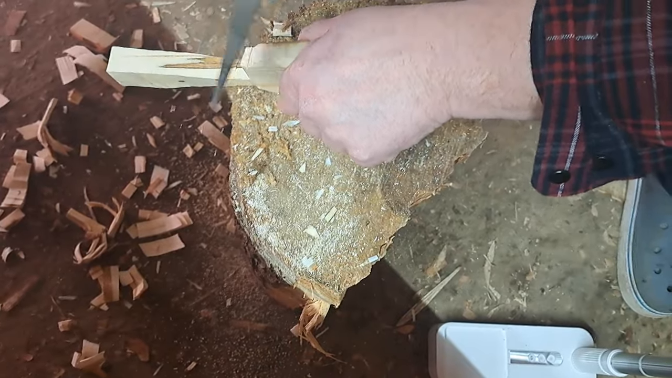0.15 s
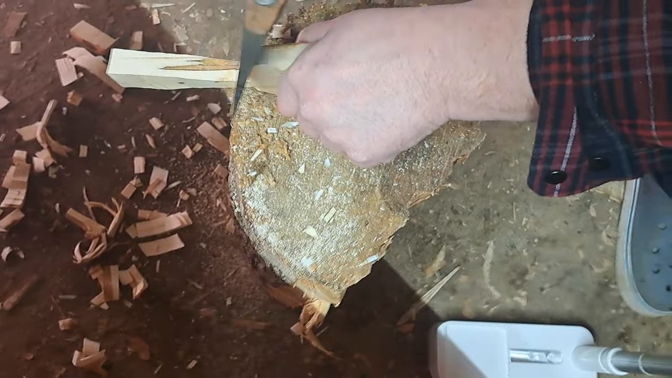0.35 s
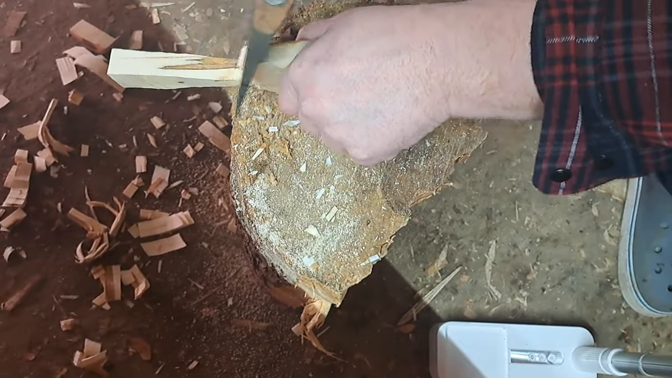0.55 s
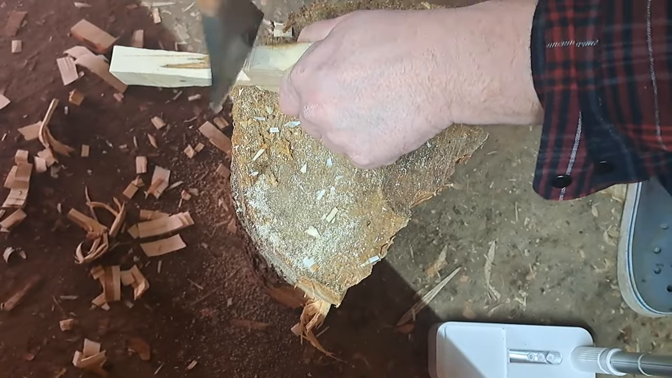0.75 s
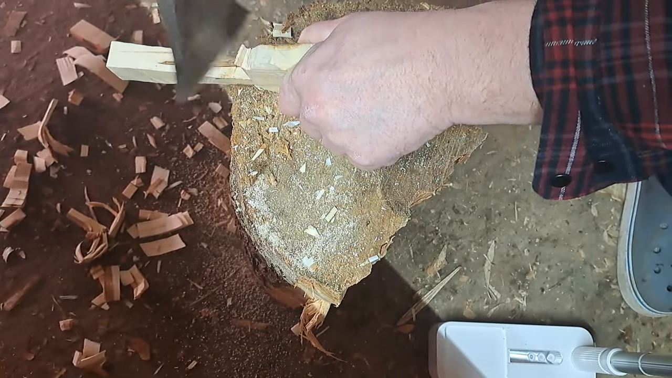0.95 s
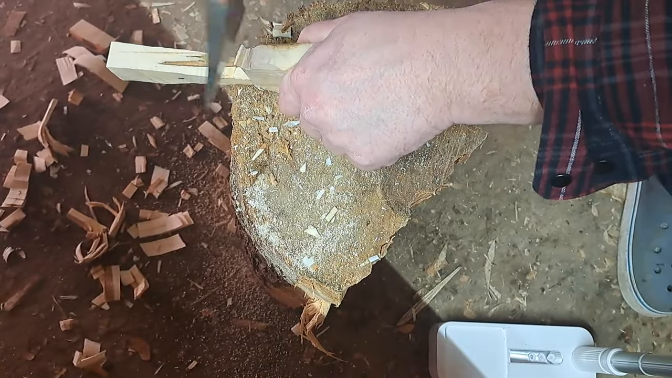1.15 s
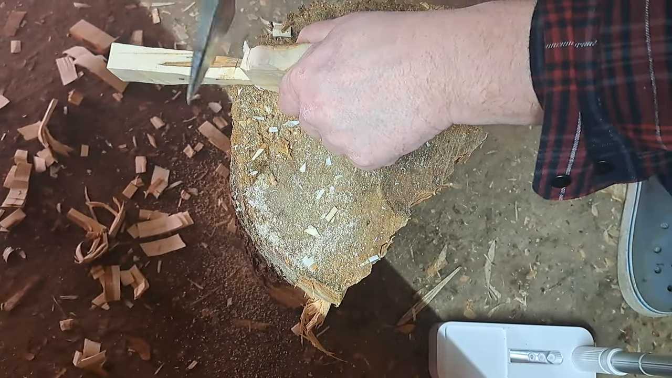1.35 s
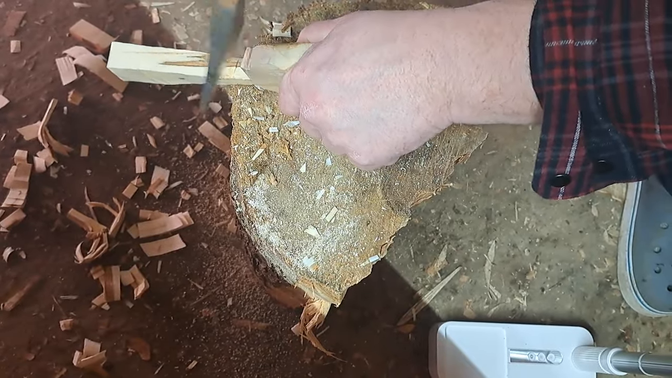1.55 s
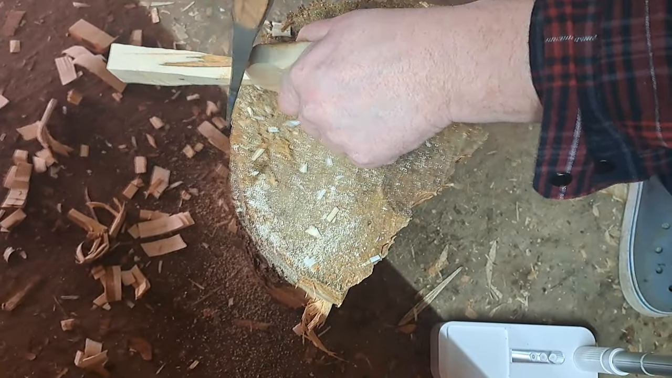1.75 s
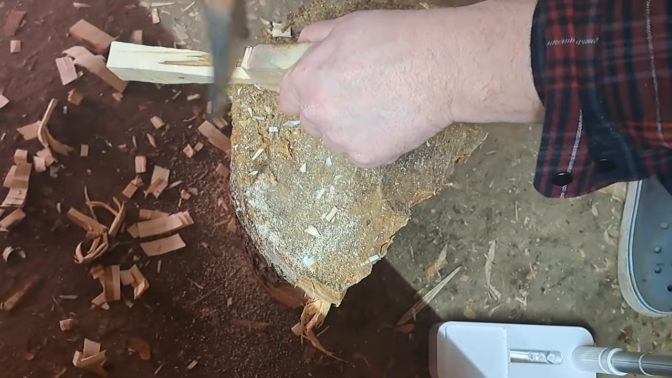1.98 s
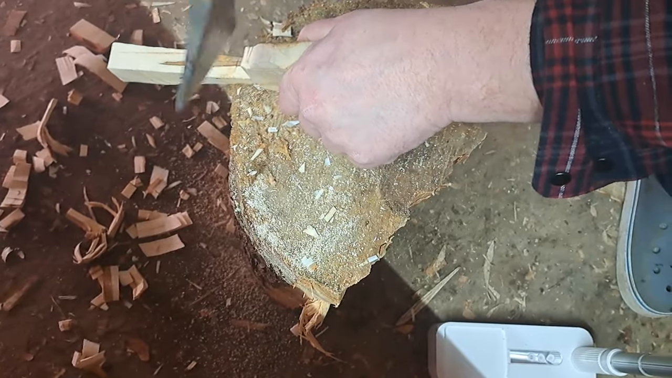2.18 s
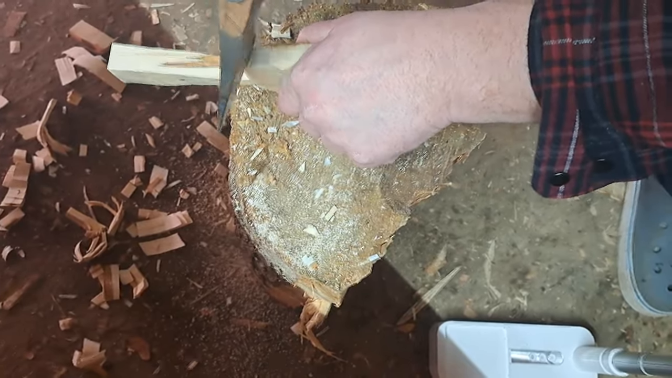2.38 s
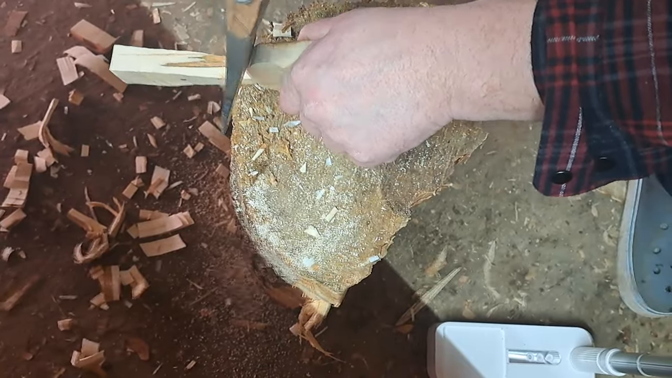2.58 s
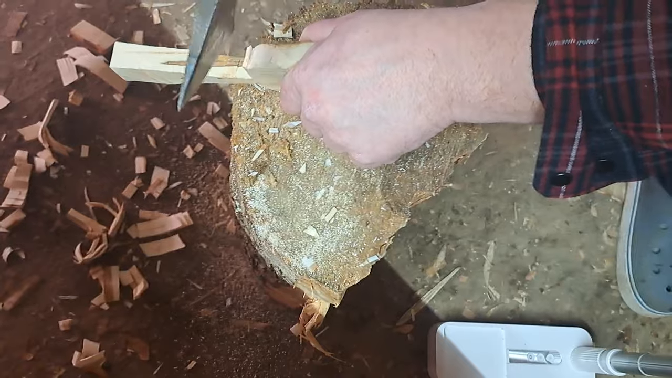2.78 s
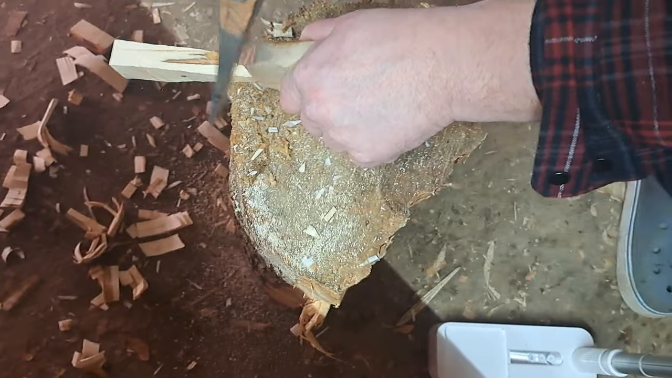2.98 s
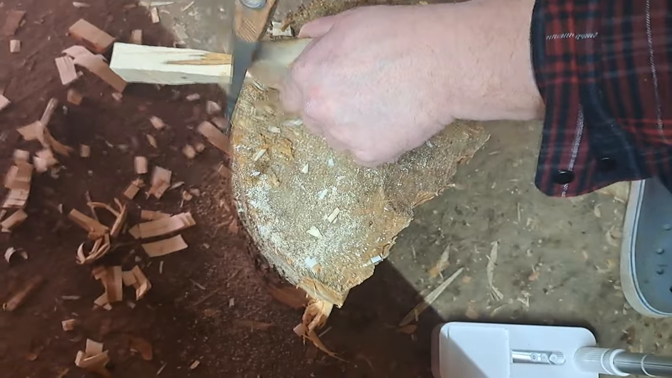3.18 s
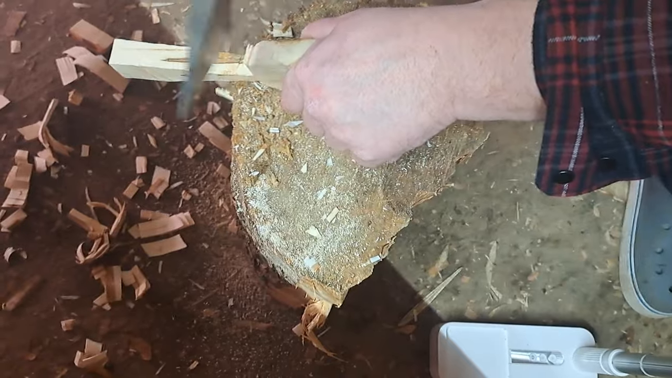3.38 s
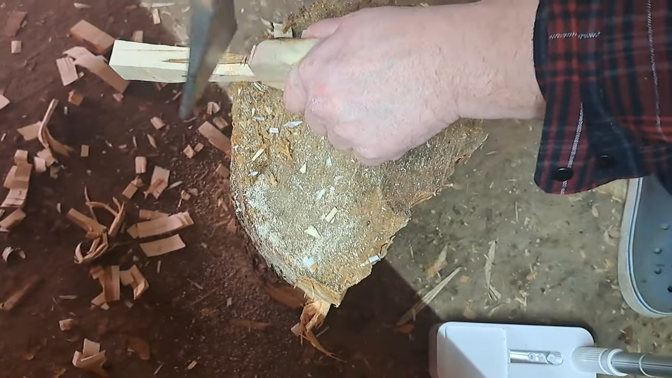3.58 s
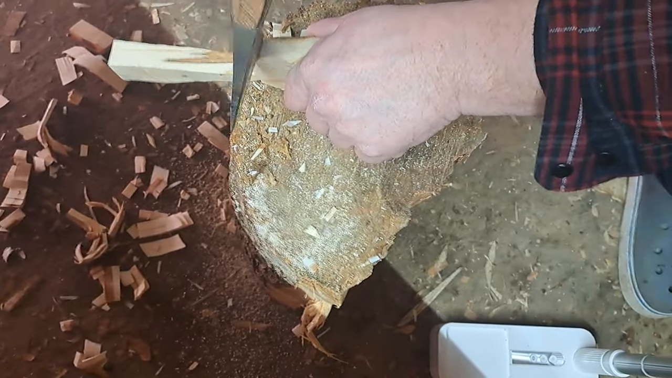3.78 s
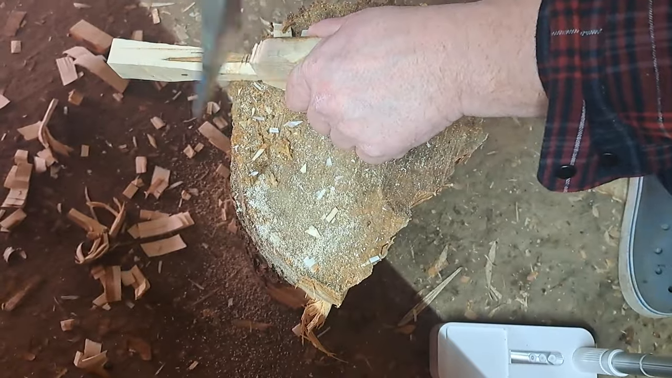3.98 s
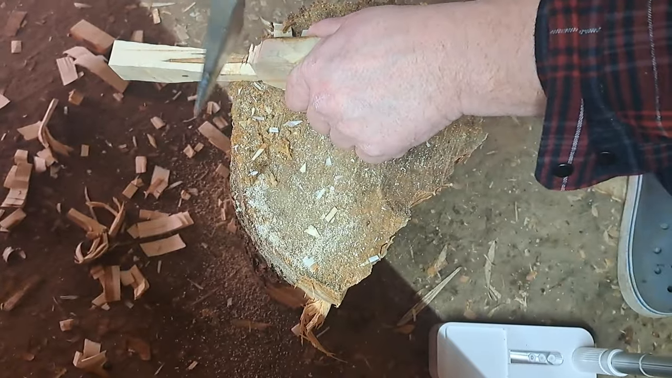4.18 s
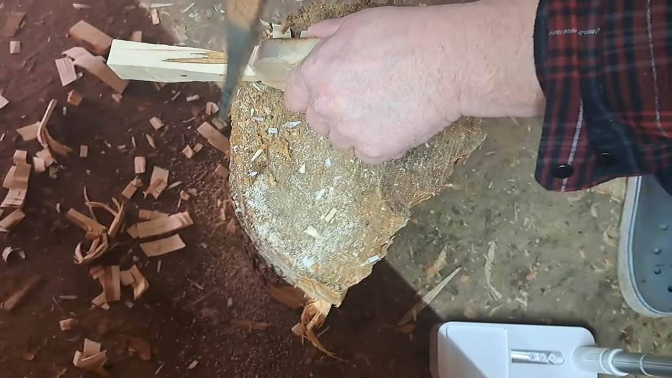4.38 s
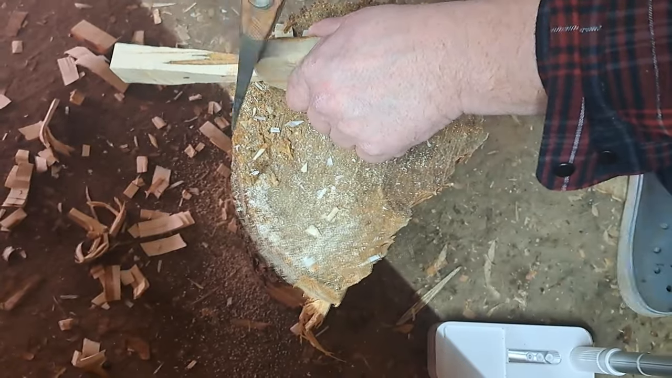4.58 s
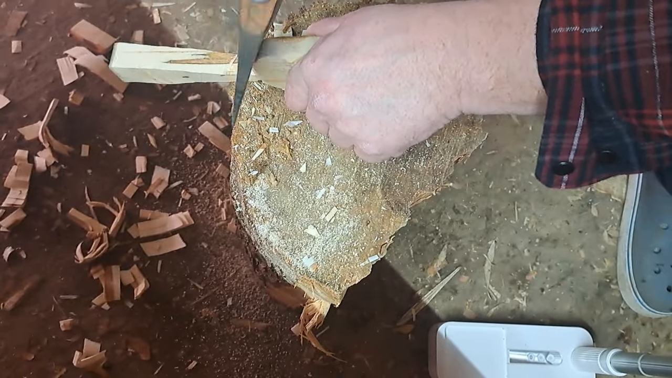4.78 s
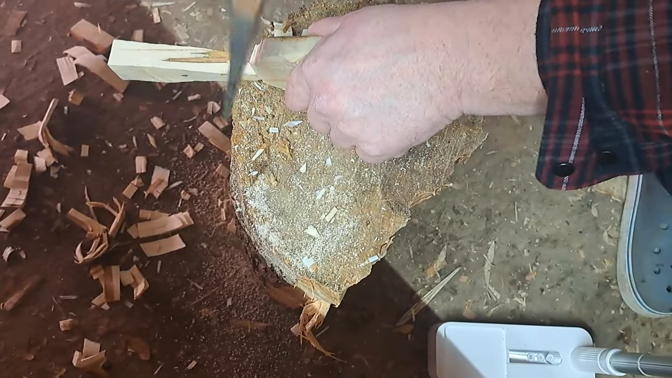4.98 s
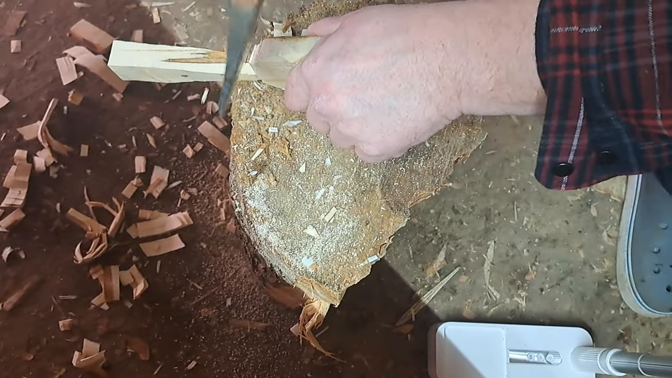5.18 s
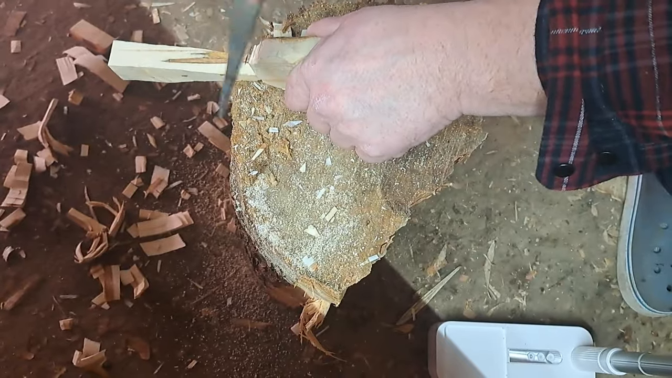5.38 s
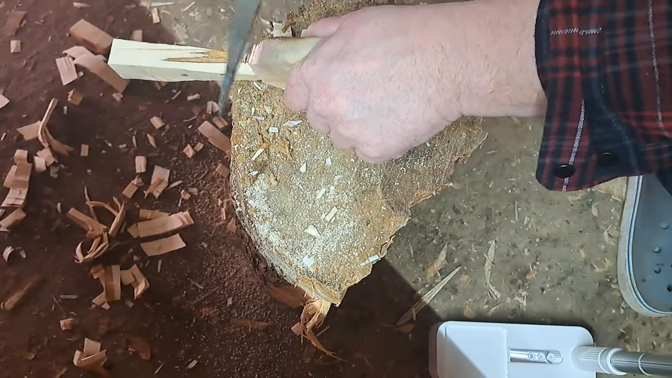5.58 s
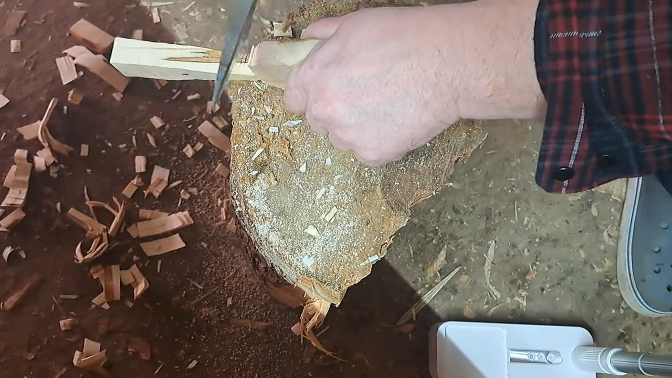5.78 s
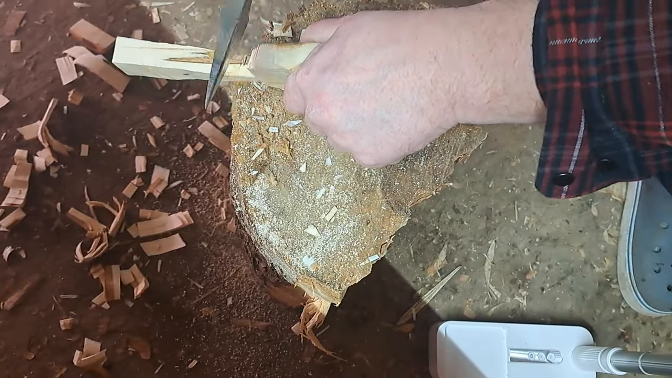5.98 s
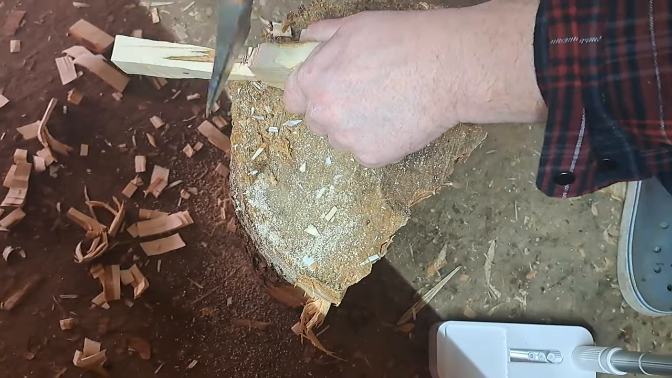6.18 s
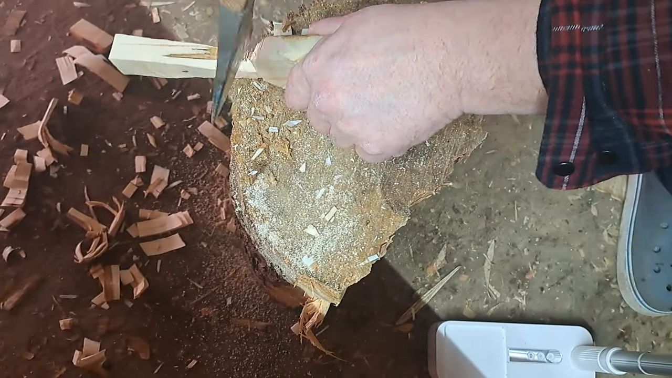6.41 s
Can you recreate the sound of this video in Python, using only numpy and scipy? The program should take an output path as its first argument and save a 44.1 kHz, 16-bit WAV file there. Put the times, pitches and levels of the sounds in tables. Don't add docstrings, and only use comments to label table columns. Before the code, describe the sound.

Close-up wood carving in a quiet workshop: sharp fibrous snaps of an axe edge, each backed by a short low thump of block and floor. Three strong chops, a gap with cloth rustle and faint chip ticks, a restart growing to full force, then lighter chops at about five a second, ending in small double-contact taps. The nearby microphone rattles dryly on its stand after the heavier blows; the room dies away quickly.

```python
import sys
import numpy as np
from scipy import signal
from scipy.fft import rfft, irfft
from scipy.io import wavfile

SR = 44100
rng = np.random.default_rng(int(sys.argv[2]) if len(sys.argv) > 2 else 0)


def elevation(decibels):
    levels = np.asarray(decibels, float)
    return 10 ** (levels / 20)


def unload_audio(sound):
    columns = np.transpose(np.atleast_2d(sound))
    steps = np.round(np.clip(columns, -1, 1) * 32767)
    wavfile.write(sys.argv[1], SR, steps.astype(np.int16))


N = 284443

# (time [s], strength [dB], knock of a flat hit [dB], treble of splintering [dB])
CRACK_EVENTS = [(0.0155, -24.5, 10.5, -14), (0.3026, -24.5, 14.5, -1), (0.5862, -28, 4.5, -12.5),
                (1.4541, -37.5, 2, -4), (1.6275, -51.5, 0.5, -11), (1.7625, -33.5, -0.5, -8.5),
                (2.0453, -25.5, 1.5, -6.5), (2.3293, -21.5, -1, -12), (2.615, -21.5, 0.5, -10.5),
                (2.9045, -25.5, 11.5, 5.5), (3.197, -26.5, 11, -0.5), (3.4708, -28.5, 5, -7),
                (3.4812, -43.5, 2, 14), (3.664, -57, 6.5, 1.5), (3.7973, -37.5, 6, -8.5),
                (4.0729, -36.5, 8, -1.5), (4.3343, -33.5, 8, -8), (4.581, -41.5, 7.5, 1),
                (4.8208, -34, 1.5, -8), (5.0478, -31, 5.5, -10.5), (5.2562, -34.5, 11.5, -12.5),
                (5.4625, -30.5, 5.5, -14), (5.672, -33, 8.5, -15.5), (5.6818, -41, -3, -9),
                (5.882, -60, 15.5, 12), (5.9075, -48, 6.5, 8.5), (6.104, -44.5, 3.5, 5.5),
                (6.127, -56, 7, 15), (6.3223, -44, 4, -10), (6.3441, -55, 15.5, 15)]


def at_hz(points, hz, order=1):
    table = np.array(points)
    return np.interp(np.log(hz), np.log(table[:, 0]), table[:, order])


def clicks(times, gains):
    out = np.full(N, 1e-18)
    places = np.clip((np.asarray(times) * SR).astype(int), 0, N - 1)
    np.add.at(out, places, gains)
    return out


def ring(x, hz, t60):
    r = elevation(-60 / (t60 * SR))
    w = 2 * np.pi * hz / SR
    return signal.lfilter([0, np.sin(w)], [1, -2 * r * np.cos(w), r * r], x)


def fade(x, t60):
    return signal.lfilter([1], [1, -elevation(-60 / (t60 * SR))], x)


def band(x, low, high):
    sos = signal.butter(2, [low, min(high, .45 * SR)], "band", fs=SR, output="sos")
    return signal.sosfilt(sos, x)


def half_octaves(low, count):
    return [low * 2 ** (k / 2 + np.array([0, .25, .5])) for k in range(count)]


def spectrum_hz():
    return np.maximum(np.fft.rfftfreq(N + 1, 1 / SR), 1)


def sides(x, balance):
    half = at_hz(balance, spectrum_hz()) / 2
    return irfft(rfft(x, N + 1) * elevation(np.array([half, -half])), N + 1)[:, :N]


def bursts(s, family_db, edges_hz, t60, click, spread_db):
    grains = rng.standard_normal(N) * elevation(spread_db * np.minimum(rng.exponential(1, N), 4))
    grains = grains / grains.std()
    out = np.zeros(N)
    for k, (level_db, low, high) in enumerate(zip(family_db, edges_hz, edges_hz[1:])):
        struck = clicks(s, elevation(level_db))
        dulled_click = click * elevation(-3 * k)
        pulse = dulled_click * struck + fade(struck, t60) * grains
        density = np.sqrt(SR / 2 / (high - low))
        out += (-1) ** k * density * band(pulse, low, high)
    return out


def air():
    # (frequency [Hz], density [dB per Hz])
    spectrum = [(15, -51), (25, -1.5), (92, 7), (313, -3.5), (358, -16.5), (410, -7.5), (600, -24.5),
                (1120, -14), (1360, -47.5), (2210, -17.5), (3510, -55), (4020, -29), (9080, -44.5),
                (12600, -19), (16500, -46.5)]
    # (frequency [Hz], likeness [-1 to 1])
    likeness = [(60, 0.92), (240, 0.2), (950, 0.61), (3770, -0.19), (15000, -0.19)]
    # (frequency [Hz], difference [dB])
    balance = [(60, -14.5), (180, -1.5), (550, 17), (1650, -16.5), (4970, -27.5), (15000, 13.5)]
    level_db = -64
    mid, side = rng.standard_normal((2, N + 1))
    hz = spectrum_hz()
    alike = np.clip(at_hz(likeness, hz), 0, 1)
    pair = np.sqrt(1 + alike) * rfft(mid) + np.sqrt(1 - alike) * rfft(side) * [[1], [-1]]
    shaped = irfft(pair * elevation(at_hz(spectrum, hz)) / np.sqrt(1 + alike), N + 1)[:, :N]
    return elevation(level_db) * sides(shaped / shaped.mean(axis=0).std(), balance)


def movement():
    # (time [s], sleeve rustle [dB], floor sway [dB])
    course = [(0.0, -68.5, -38.5), (0.5, -76, -57.5), (0.74, -60.5, -80), (0.92, -76, -75),
              (1.15, -69.5, -91), (1.4, -72, -64), (1.62, -63.5, -47), (2.0, -58.5, -45), (2.46, -61, -66),
              (3.1, -59, -48.5), (4.1, -65, -51.5), (4.47, -75, -50.5), (4.9, -63.5, -37),
              (5.8, -106.5, -49.5), (6.23, -65, -41.5), (6.45, -63, -37)]
    recoil_db, recoil_rise_s, recoil_t60_s = -20.5, 0.036, 0.33
    s, rustle_db, sway_db = np.transpose(course)
    t = np.arange(N) / SR
    left, right, deep = rng.standard_normal((3, N))
    cloth = np.array([left, right])
    rustle = band(cloth, 770, 3800) + 0.5 * band(cloth, 2100, 2400) + 0.17 * band(cloth, 3700, 4760)
    sway = band(band(deep, 35, 47), 35, 47)
    struck, strength_db = np.transpose(CRACK_EVENTS)[:2]
    slow = np.exp(-1 / (recoil_rise_s * SR))
    shake = fade(clicks(struck, elevation(strength_db + recoil_db)), recoil_t60_s)
    recoil = signal.lfilter([1 - slow], [1, -slow], shake)
    sleeve = (elevation(np.interp(t, s, rustle_db)) + recoil) * rustle / rustle.std()
    return sleeve + elevation(np.interp(t, s, sway_db)) * sway / sway.std()


def room_response():
    # (frequency [Hz], early t60 [s], early level [dB], late level [dB])
    decay = [(384, 0.57, -7, -28), (735, 0.22, -1.5, -31), (1340, 0.17, -3.5, -40.5), (2374, 0.2, 0, -40.5),
             (5870, 0.17, 3.5, -40), (11760, 0.17, -9, -33.5)]
    late_t60_s, right_lag_s = 0.45, .00028
    t = np.arange(SR // 2) / SR
    white = rng.standard_normal((2, 2, len(t)))
    tail = 0
    for k, (low, hz, high) in enumerate(half_octaves(251.0, count=12)):
        early = at_hz(decay, hz, order=2) - 60 * t / at_hz(decay, hz)
        late = at_hz(decay, hz, order=3) - 60 * t / late_t60_s
        tail = tail + (elevation(early) + elevation(late)) * band(white[k % 2], low, high)
    tail = elevation(-27.5) * tail
    tail = tail * np.clip(t / 0.0005 - .6, 0, 1)
    tail[0, 0] += 1
    tail[1, int(right_lag_s * SR)] += .6
    return tail


def room(x, tail):
    # (frequency [Hz], difference [dB])
    balance = [(60, 0.5), (130, 15.5), (290, -16), (640, -3.5), (1410, -5.5), (3100, -3.5), (6820, 4),
               (15000, 10.5)]
    return sides(signal.fftconvolve(x[None], tail, axes=1)[:, :N], balance)


def port_colour(x):
    # (frequency [Hz], gain [dB])
    response = [(4500, 9.5), (6500, 7.5), (8000, 1.5), (9500, 0.5), (11500, 8.5), (13000, 8), (15000, -5.5),
                (16500, -13.5)]
    return irfft(rfft(x, N + 1) * elevation(at_hz(response, spectrum_hz())), N + 1)[:, :N]


def chips():
    # (time [s], peak level [dB])
    landings = [
        (0.834, -66),
        (0.9728, -64),
        (2.439, -55),
        (2.74, -47.5),
        (3.3094, -69),
        (3.8826, -53.5),
        (4.6578, -56),
    ]
    s, peak_db = np.transpose(landings)
    ticks = fade(clicks(s, elevation(peak_db + 6.0)), 0.0048) * rng.standard_normal(N)
    return band(ticks, 7000, 20000)


def rattles(tail):
    # (time [s], first swing [dB], return swing [dB], loose chatter [dB])
    rocks = [
        (0.0191, -1.5, 1, -40.5),
        (0.3056, -35, -1.5, -34.5),
        (0.590, -9.5, -7, -3.5),
        (1.763, -8.5, -40, -40),
        (2.0482, -3, 0, -6.5),
        (2.333, 1, -2.5, -10.5),
        (2.6165, 1, -0.5, -24),
        (2.9053, -46, -1.5, -45),
        (3.4860, -4, -10, -42),
        (4.8225, -13.5, -45, -35),
    ]
    # (delay [s], clack [dB], tick [dB], fizz [dB])
    first_swing = [(.021, -16.5, -37.5, -46)]
    return_swing = [(0.0505, -21, -41.5, -54)]
    chatter = [(0.0452, -23.5, -42.5, -45.5), (0.0795, -36.5, -77, -51)]
    edges_hz = [1800, 2800, 7600, 17000]
    # (frequency [Hz], difference [dB])
    balance = [(1500, -15.5), (4000, -17.5), (12000, -3)]
    lag_s = 0.00018
    start, *swings_db = np.transpose(rocks)
    contacts = []
    for swing_db, group in zip(swings_db, (first_swing, return_swing, chatter)):
        for delay, *colour_db in group:
            contacts.append((start + delay, *np.add.outer(colour_db, swing_db)))
    s, clack_db, *upper_db = np.concatenate(contacts, axis=1)
    family_db = np.array([clack_db - 14.0, *upper_db]) - 2.5
    ticks = bursts(s, family_db, edges_hz, t60=0.013, click=6.6, spread_db=-5.0)
    late = np.r_[np.zeros(int(lag_s * SR)), ticks][:N]
    return elevation(-15) * room(ticks, tail) + sides(np.array([ticks, late]), balance)


def blade():
    # (time [s], upper mode [dB], lower mode [dB])
    rings = [
        (2.3306, -34, -34),
        (2.9048, -17, -22),
        (3.1965, -17.5, -31),
        (5.909, -39, -43),
        (6.1245, -60, -35),
        (6.3426, -58, -37),
    ]
    s, upper_db, lower_db = np.transpose(rings)
    lower = ring(clicks(s, elevation(lower_db - 5)), 5150, .016)
    return lower + ring(clicks(s, elevation(upper_db - 7)), 6250, .018)


def thuds():
    # (time [s], force [dB], rim nearness as gain of the upper modes [dB])
    blows = [(0.0186, -14.5, -3), (0.3054, -17, -3.5), (0.5899, -16.5, 1), (1.014, -64.5, 14),
             (1.4617, -26.5, -11.5), (1.7641, -17.5, -6.5), (2.0474, -13, -21), (2.334, -13.5, -5.5),
             (2.6161, -12.5, -12.5), (2.9075, -15, 0.5), (3.1972, -17, -4.5), (3.4733, -35, 9),
             (3.4871, -19.5, -2.5), (3.8009, -25.5, -6), (4.0771, -34.5, 0), (4.0947, -33.5, -16),
             (4.3379, -24, 5), (4.585, -26, 5.5), (4.8244, -22, 4.5), (5.051, -24.5, 2), (5.26, -24, 5),
             (5.4687, -26, 8.5), (5.6748, -21, 4.5), (5.8846, -26.5, 0), (5.9136, -31.5, -31),
             (6.1046, -28.5, 5), (6.136, -32, -0.5), (6.3252, -29.5, 1), (6.3524, -31, 6)]
    # (frequency [Hz], t60 [s], share left [signed], share right [signed])
    block = [(49.2, 0.44, -0.44, -0.27), (63.8, 0.31, -0.34, -0.12), (69.2, 0.6, 0.75, -0.28),
             (73.0, 0.46, 0.67, 0.84), (77.4, 0.6, 0.29, 0.33), (98.8, 0.18, 0.57, 0.85),
             (119.2, 0.12, -1.0, -0.91), (135.0, 0.52, 0.28, 0.33), (154.3, 0.45, -0.33, -0.48),
             (164.5, 0.23, 0.34, 0.44), (181.1, 0.27, -0.31, -0.2), (199.5, 0.56, 0.16, 0.16),
             (229.6, 0.35, 0.4, 0.29), (255.4, 0.19, -0.22, 0.06), (262.9, 0.49, 0.07, 0.05),
             (271.7, 0.31, -0.13, -0.29), (296.6, 0.13, -0.36, -0.25), (327.1, 0.13, -0.17, -0.3),
             (360.9, 0.27, -0.06, -0.06), (400.9, 0.1, -0.08, -0.09)]
    # (frequency [Hz], t60 [s], share left [ratio], share right [ratio])
    hollow = [(42.2, 0.38, .12, 0.028), (241, 0.28, 0.04, 0.082), (259.7, 0.49, 0.047, 0.04),
              (337, 0.4, 0.075, .07)]
    # (frequency [Hz], density [dB per Hz], t60 [s])
    rumble = [(30.2, -47, .8), (50.7, -20, 0.3), (66.4, -7.5, 1), (111, -2, 0.32), (190, -7, 0.37),
              (326, -8, 0.25), (540, -39, 0.072)]
    s, deep_db, rim_db = np.transpose(blows)
    middle_db = deep_db + 0.18 * rim_db - 1.5
    upper_db = deep_db + rim_db
    chance = rng.standard_normal((len(s), len(block)))
    out = np.zeros((2, N))
    for k, (hz, t60, left, right) in enumerate(block):
        mode_db = deep_db if hz < 175 else middle_db if hz < 215 else upper_db
        strength = elevation(mode_db + .7 * chance[:, k])
        out += np.outer([left, right], ring(clicks(s, strength), hz, t60))
    for hz, t60, left, right in hollow:
        out += np.outer([left, right], ring(clicks(s + .012, elevation(upper_db)), hz, t60))
    white = rng.standard_normal((2, 3, N))
    for k, (low, hz, high) in enumerate(half_octaves(26.38, count=9)):
        strength = elevation(np.maximum(deep_db, upper_db if hz > 175 else -99))
        decay = fade(clicks(s, strength), at_hz(rumble, hz, order=2))
        swell = signal.lfilter([.002], [1, -.998], decay)
        shared, left, right = band(white[k % 2], low, high)
        out += elevation(at_hz(rumble, hz) + 18.5) * swell * (shared + 0.51 * np.array([left, right]))
    return out


def cracks():
    # (time [s], strength [dB], knock [dB], treble [dB])
    grazes = [
        (2.9022, -39, 12, 2.5),
        (3.1922, -31, 6, 1.2),
    ]
    edges_hz = [450, 1100, 2000, 3800, 7600, 17000]
    # (share of treble [ratio], share of knock [ratio], level [dB])
    splintering = [(.4, 0.29, -1.5), (.8, 0.076, -2.5), (1.2, 0.046, 1.5)]
    # (frequency [Hz], level [dB], t60 [s])
    slap_modes = [(1360, -2, 0.002), (5200, -18.5, 0.0065)]
    # (frequency [Hz], level [dB], t60 [s])
    blank = [(574.3, -42.5, 0.036), (790, -12, 0.06), (1347, 0, 0.0054), (1441, 8, 0.0058),
             (1700, 9.5, 0.014), (2260, 0, 0.004), (3183, -36, 0.0041), (4320, -34.5, 0.016),
             (5050, 1.5, 0.006), (5810, 1, 0.054), (10700, -10.5, 0.014), (11600, 14, 0.017)]
    slap_delay_s = 0.002156
    s, body_db, knock_db, treble_db = np.transpose(CRACK_EVENTS + grazes)
    relative_db = [0 * s, knock_db + 0.5]
    for share, flat, db in splintering:
        relative_db.append(share * treble_db + flat * knock_db + db)
    family_db = body_db + np.array(relative_db)
    bite = bursts(s - .0012, family_db[:3] - 18.5, edges_hz, t60=0.011, click=0, spread_db=1.0)
    snap = bursts(s, family_db - 5.0, edges_hz, t60=0.0088, click=9.73, spread_db=2.5)
    tear = bursts(s, family_db - 15.5, edges_hz, t60=0.052, click=0, spread_db=4.0)
    slap = clicks(s + slap_delay_s, elevation(body_db + knock_db))
    contact = bite + snap + tear + sum(elevation(db) * ring(slap, hz, t60) for hz, db, t60 in slap_modes)
    out = contact.copy()
    for k, (hz, db, t60) in enumerate(blank):
        out += (-1) ** k * elevation(db - 50) * ring(contact, hz, t60)
    return out


def scene():
    tail = room_response()
    near = room(cracks() + blade() + chips(), tail) + rattles(tail)
    return thuds() + port_colour(near) + movement() + air()


def roll_off(x):
    return signal.sosfilt(signal.butter(12, 16980, fs=SR, output="sos"), x)


def record(dry):
    rounded = 1.442 * np.tanh(dry / 1.394)
    low_pass = signal.cheby2(10, 60, 16200 + 750, fs=SR, output="sos")
    cut = signal.sosfilt(low_pass, rounded)
    return roll_off(np.clip(cut, -1, 1))


dry = scene()
out = record(dry)
unload_audio(out)
```